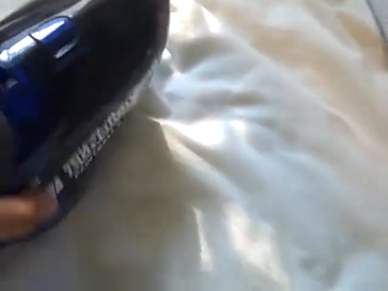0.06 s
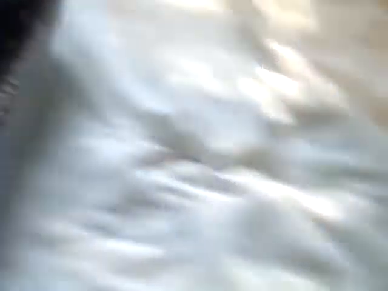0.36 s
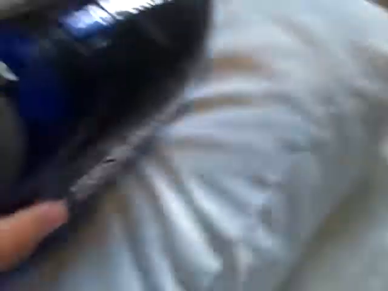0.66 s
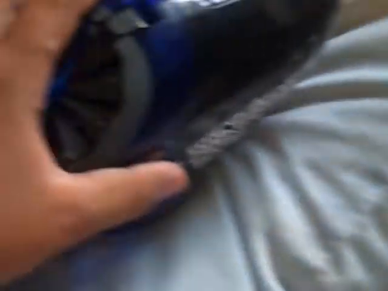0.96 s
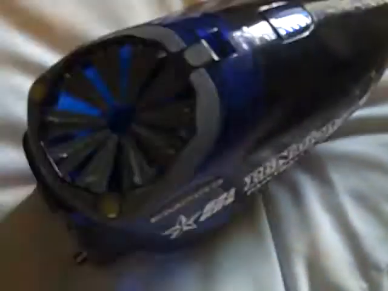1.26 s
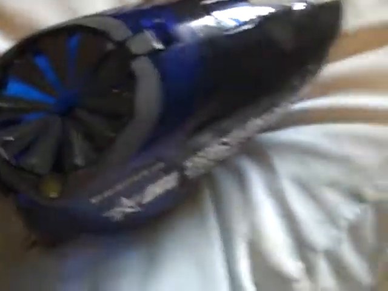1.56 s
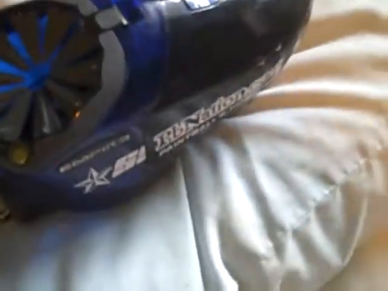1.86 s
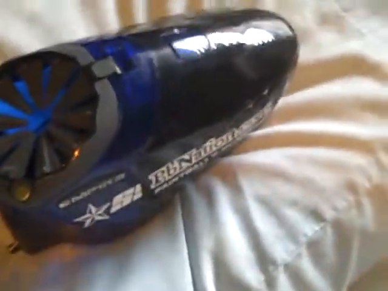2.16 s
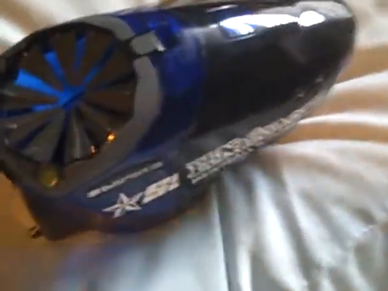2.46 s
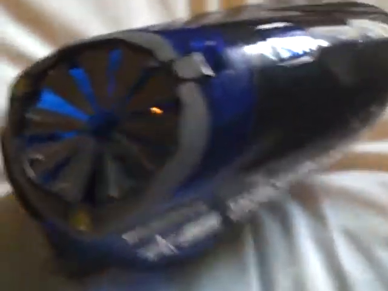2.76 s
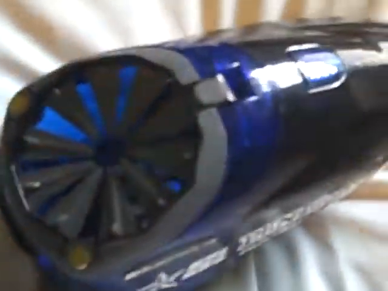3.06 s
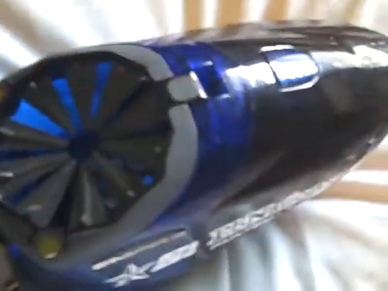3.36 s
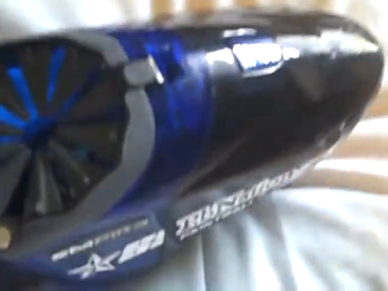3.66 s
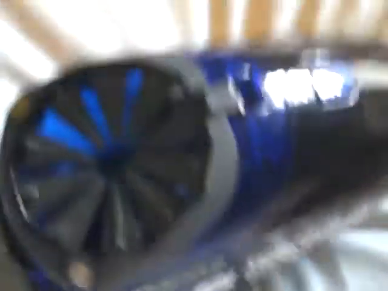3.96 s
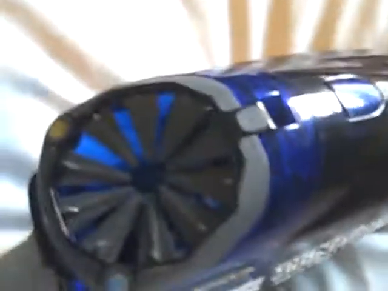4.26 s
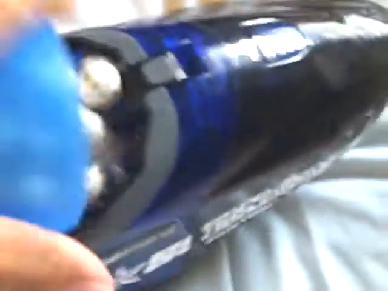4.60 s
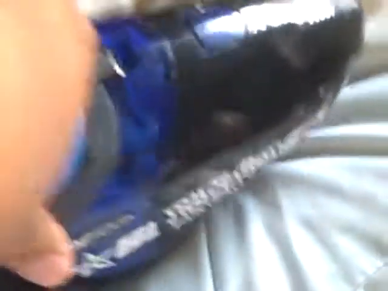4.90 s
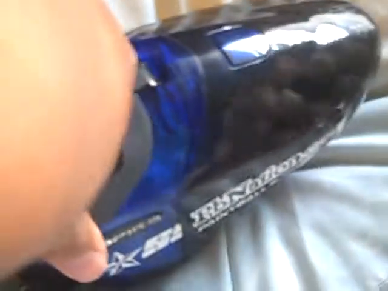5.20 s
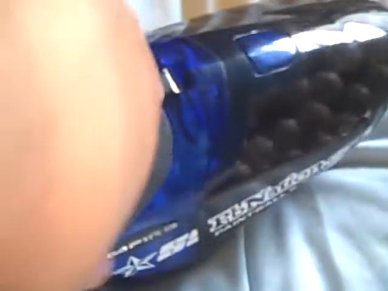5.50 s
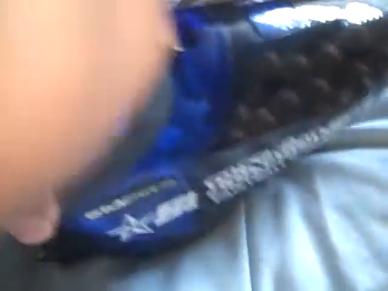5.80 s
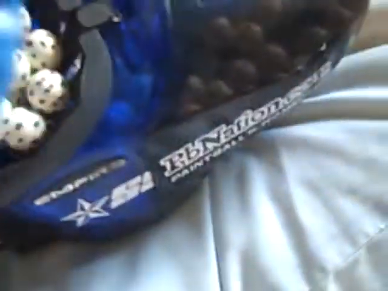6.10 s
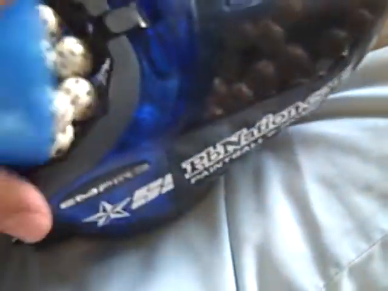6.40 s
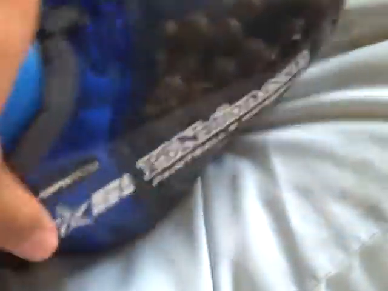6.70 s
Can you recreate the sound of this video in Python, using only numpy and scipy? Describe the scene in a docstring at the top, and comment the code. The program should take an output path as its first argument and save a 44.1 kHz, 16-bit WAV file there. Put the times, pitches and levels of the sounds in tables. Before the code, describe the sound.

In a quiet bedroom, hands lightly tap and faintly rub a hollow plastic hopper close to the microphone, with a slight rustle of bedding. A catch snaps once, sharply, ringing the empty shell. About a second later paintballs are poured in, hitting the walls and each other in a dense, hollow clatter. The rattle thins to single knocks, short rolls and a few soft bumps on the plastic.

```python
"""In a quiet bedroom, a plastic paintball hopper (a hollow ball holder) lies close by on a bed.
Hands tap and rub it, the bedding rustles, and a catch snaps once, sharply, ringing the empty shell.
Then a pod of paintballs is tipped in: they hit the walls and each other in a dense, hollow clatter.
It thins to single knocks and short rolls as the last balls are shaken out and the pod is drawn away."""
import sys
import numpy as np
from scipy import signal
from scipy.fft import rfft, irfft, next_fast_len
from scipy.io import wavfile
from scipy.ndimage import uniform_filter1d

SR = 44100
rng = np.random.default_rng(int(sys.argv[2]) if len(sys.argv) > 2 else 0)


def inscribe(sig):
    """Save sig as 16-bit PCM at rate SR to the path in sys.argv[1].

    A 1-D sig is mono; a 2-D sig holds one channel per row.
    Samples are clipped to [-1, 1] before scaling.
    """
    pcm = np.round(np.clip(np.atleast_2d(sig).T, -1, 1) * 32767)
    wavfile.write(sys.argv[1], SR, pcm.astype(np.int16))


N = 306438
TIME = np.arange(N) / SR  # seconds into the scene
HIT_TIME = np.arange(SR // 6) / SR  # seconds into one hit
FILLED_S = 5.13  # from about here, balls cover the floor in a heap

# tone of the room air: f/Hz, level/dB
AIR_TONE = [(20, 1.5), (91, -11.5), (123, -10.5), (216, -10.5), (802, -13.5), (1480, -15.5), (16000, -31)]
# electric hum: f/Hz, level/dB
HUM_NOTES = [(118.4, -76), (209.9, -79)]
# fingers and pod bump the plastic, and the catch slips just before it snaps and bounces back after: t/s,
# level/dB, knock f/Hz, thud over knock/dB
TAP_HITS = [(0.0683, -43, 1640, -4), (0.0810, -43.5, 1430, 8.5), (0.1046, -46, 1710, 0),
            (0.6867, -48, 1310, -4), (1.001, -51, 1190, -1), (2.0543, -50, 1770, -16),
            (2.1326, -44, 1720, -21), (3.0535, -46, 1070, -24), (3.2291, -38, 1130, -10),
            (3.2359, -21, 1066, -22), (3.2526, -37.5, 1040, -3), (3.5174, -35, 1390, -29),
            (3.613, -45.5, 1370, -11), (5.5967, -36.5, 1310, -3.5), (5.8479, -33.5, 1570, -3.5),
            (6.5204, -35, 1724, -6.5), (6.657, -33, 1235, -4.5), (6.687, -40.5, 1294, -3.5)]
# tone of a hard tick: f/Hz, level/dB
TICK_TONE = [(1200, -14), (1900, -2), (2700, -1.5), (3200, -4.5), (5400, -7.5), (8100, -20.5), (10000, -19),
             (16000, -30.5)]
# light snaps of plastic: t/s, level/dB
FLICK_HITS = [(0.078, -47.5), (3.075, -56), (3.691, -40.5), (5.707, -47.5), (6.1193, -44), (6.839, -55.5)]
# a faint falling swish of cloth and a faint squeak: middle t/s, length/s, level/dB, f/Hz, glide/(octaves per s)
SWISH_AND_SQUEAK_GLIDES = [(0.496, .08, -61, 1387, -2), (3.419, 0.024, -56, 1078, 10)]
# the bands in each glide: multiple of its pitch, level/dB
GLIDE_PARTS = [(.54, -7.5), (1, -4), (2.02, -13)]
# the hand rubs the shell: middle t/s, length/s, level/dB
RUB_STROKES = [(.69, 0.059, -64), (2.275, 0.029, -71.5), (3.49, 0.13, -64.5), (4.2, 0.029, -64.5),
               (4.245, 0.098, -63.5), (6.676, 0.032, -60)]
# tone of a rub: f/Hz, level/dB
RUB_TONE = [(71, -24), (120, 3), (337, 3), (587, -2), (884, -4.5), (1540, -7.5), (6000, -17), (7800, -45),
            (13200, -120)]
# the bedding rustles: middle t/s, length/s, level/dB
RUSTLE_STROKES = [(.69, 0.063, -73), (2.277, 0.044, -64.5), (2.42, .04, -72.5), (2.56, .04, -72),
                  (2.69, 0.038, -68), (2.87, .05, -74), (3.5, 0.085, -67), (6.68, 0.086, -68.5)]
# tone of a rustle: f/Hz, level/dB
RUSTLE_TONE = [(1500, 0), (4000, 0), (6300, 3), (8200, -9), (11500, -1.5), (16000, -35)]
# the hand slides along the shell: t/s, level/dB
SLIDE_LEVELS = [(1.37, -96), (1.44, -75.5), (1.8, -73.5), (2.0, -88), (2.9, -90), (3.03, -76.5), (4.1, -79),
                (4.3, -100)]
# tone of that slide: f/Hz, level/dB
SLIDE_TONE = [(1500, -2), (5400, -2.5), (6400, 4.5), (8000, -17), (11800, -3), (16000, -21)]
# fine, crisp scrapes: middle t/s, length/s, level/dB
SCRAPE_STROKES = [(2.23, 0.11, -71.5), (3.54, 0.12, -70.5)]
# tone of a scrape: f/Hz, level/dB
SCRAPE_TONE = [(7500, -20), (11500, -6), (13000, -17), (16000, -15)]
# the sharp click: t/s, shell level/dB, crack level/dB
CLICK_HIT = (3.2383, -16, -26.5)
# tone of its crack: f/Hz, level/dB
CRACK_TONE = [(1200, -18), (2200, 2.5), (5500, -8), (8200, -16), (10900, -9.5), (16000, -25)]
# notes of the empty shell: f/Hz, level/dB, t60/s (time to fade by 60 dB)
SHELL_NOTES = [(285, -6, 0.058), (686, -13.5, 0.02), (760, 1, 0.016), (913, -11.5, 0.032),
               (1280, -3.5, 0.018), (1360, -21, 0.035), (1700, -15, 0.024), (3000, -26, 0.018)]
# note of the air inside it: f/Hz, level/dB, t60/s
INNER_AIR_NOTES = [(275, -21.5, 0.23)]
# notes of the catch itself: f/Hz, level/dB, t60/s
CATCH_NOTES = [(5480, 3, 0.0032), (7040, -3.5, 0.0037), (9500, -17, .005)]
# balls that stand out: t/s, level/dB, tick over knock/dB
BALL_HITS = [(4.5098, -33.5, -19), (4.5333, -24.5, -6.5), (4.578, -28, -12.5), (4.6288, -18, -15),
             (4.6501, -24, -7.5), (4.66, -21, -10), (4.6628, -19.5, -10), (4.7034, -7.5, -20.5),
             (4.746, -21.5, -4), (4.7668, -20.5, -9), (4.791, -11, -15), (4.799, -19, -7),
             (4.8113, -18.5, -19), (4.8262, -8.5, -21.5), (4.858, -25.5, -5.5), (4.8991, -11.5, -20),
             (4.9044, -12.5, -11.5), (4.915, -23.5, -3), (4.9581, -18, -8.5), (4.977, -16.5, -14),
             (5.011, -23, -5.5), (5.02, -13.5, -20), (5.0345, -14, -12.5), (5.056, -17, -21),
             (5.088, -15.5, -14), (5.099, -9, -27.5), (5.109, -11, -17.5), (5.1294, -15.5, -15),
             (5.19, -16.5, -14.5), (5.195, -21.5, -10.5), (5.219, -20.5, -15), (5.281, -22, -13.5),
             (5.329, -29.5, -13), (5.42, -33, -35), (5.473, -31, -13.5), (5.6875, -35.5, -10),
             (5.6938, -27, -21), (5.706, -38, -22), (5.7192, -19.5, -20.5), (5.7636, -25.5, -26),
             (5.9475, -28.5, -15), (6.0134, -34, -12.5), (6.0188, -33, -16.5), (6.0639, -39, -20),
             (6.149, -43.5, -12), (6.2522, -42, -7.5), (6.318, -38.5, -14.5), (6.353, -38, -17.5),
             (6.4136, -37.5, -19), (6.425, -40, -13), (6.4394, -34, -14.5), (6.4581, -44.5, -11)]
# wall notes that ring on after a ball: f/Hz, level/dB, t60/s
WALL_NOTES = [(970, -21, .06), (1272, -24, 0.062), (1383, -33.5, 0.29)]
# the pour swells as the pod tips and dies as it empties: t/s, level/dB
POUR_LEVELS = [(4.53, -72), (4.6, -52), (4.66, -42), (4.8, -40), (5.06, -33.5), (5.24, -40), (5.34, -46),
               (5.48, -63)]
# shakes of the pod set the heap rolling: middle t/s, length/s, level/dB
POD_SHAKES = [(5.54, 0.046, -59), (5.64, 0.059, -53.5), (5.77, 0.083, -57), (6.02, 0.082, -61),
              (6.46, 0.083, -60.5), (6.68, 0.051, -55.5), (6.76, 0.046, -63.5)]
# echo inside the hopper: f/Hz, t60/s
HOPPER_ECHO = [(250, 0.18), (1200, 0.037), (4000, 0.055), (12000, 0.032)]
# echo of the bedroom: f/Hz, t60/s
ROOM_ECHO = [(200, 0.21), (1400, 0.23), (6000, 0.29), (14000, 0.13)]


def amp(db):
    """Turn decibels into a factor to multiply by."""
    return 10 ** (np.asarray(db) / 20)


def unit(x):
    """Scale x to an average (rms) size of 1."""
    return x / np.sqrt(np.mean(x ** 2) + 1e-20)


def along(points, hz):
    """Read between (f/Hz, value) points on a pitch-like scale."""
    freqs, values = np.transpose(points)
    return np.interp(np.log(hz + 1), np.log(freqs + 1), values)


def coloured(x, tone):
    """Filter x to a tone; the table sets only the balance of low and high."""
    size = next_fast_len(N + SR // 4, True)
    gain = unit(amp(along(tone, np.fft.rfftfreq(size, 1 / SR))))
    cepstrum = irfft(np.log(np.maximum(gain, 1e-6)), size)
    # this fold makes the filter ring after a hit, never before it
    cepstrum[1:size // 2] *= 2
    cepstrum[size // 2 + 1:] = 0
    return irfft(rfft(x, size) * np.exp(rfft(cepstrum)), size)[:N]


def noise(tone):
    """Steady noise with the given tone."""
    return unit(coloured(rng.standard_normal(N), tone))


def fade(t, t60):
    """Die away by 60 dB every t60 seconds."""
    return np.exp(-np.log(1000) * t / t60)


def rise(attack_s):
    """The quick start of a hit, from 0 to 1."""
    return 1 - np.exp(-HIT_TIME / attack_s)


def ring(hz, t60, attack_s):
    """One note that is struck and fades."""
    return np.sin(2 * np.pi * hz * HIT_TIME) * fade(HIT_TIME, t60) * rise(attack_s)


def struck(notes):
    """One blow rings several notes; neighbours swing opposite ways."""
    return sum(amp(db) * (-1) ** k * ring(hz, t60, 0.00038) for k, (hz, db, t60) in enumerate(notes))


def burst(t60, attack_s):
    """A short crack of noise."""
    return rng.standard_normal(len(HIT_TIME)) * fade(HIT_TIME, t60) * rise(attack_s)


def swell(s, length):
    """A smooth rise and fall around time s."""
    return np.exp(-2 * ((TIME - s) / length) ** 2)


def swells(rows):
    """One loudness curve from (t/s, length/s, level/dB) rows."""
    return sum(amp(db) * swell(s, length) for s, length, db in rows)


def after(s, middle_s, takes_s):
    """A smooth step from 0 to 1."""
    return (1 + np.tanh((s - middle_s) / takes_s)) / 2


def add(track, s, sound):
    """Mix a sound into a track at time s."""
    part = track[max(round(s * SR), 0):][:len(sound)]
    part += sound[:len(part)]


def cut_bass(x, corner_hz=185):
    """Take out the lows, of which a small shell gives off very little."""
    return signal.sosfilt(signal.butter(N=4, Wn=corner_hz, btype="high", fs=SR, output="sos"), x)


def echoes(x, decay, size=4096):
    """A wash of echoes that keeps changing; each frequency dies at its own speed."""
    wet, window = np.zeros(N), signal.get_window("hann", size)
    for start in range(0, N - size, size // 2):
        hz, t, bands = signal.stft(rng.standard_normal(SR // 3), SR, nperseg=128)
        tail = signal.istft(bands * fade(t, along(decay, hz)[:, None]), SR, nperseg=128)[1]
        piece = x[start:start + size] * window
        add(wet, start / SR + .002, signal.fftconvolve(piece, tail / np.linalg.norm(tail)))
    return wet


def impacts(rows, knock_t60, tick_t60, thud_hz, thud_spread, side_db):
    """Each hit knocks the wall, thuds the whole shell and ticks where hard surfaces meet."""
    body, ticks = np.zeros(N), np.zeros(N)
    for s, knock_db, hz, thud_db, tick_db in rows:
        below, above, low, skin = rng.standard_normal(4)
        # the notes on either side of the knock depend on the spot that is hit
        lower = ring(hz * 0.731 * np.exp(0.12 * below), 0.013, 0.0008)
        upper = ring(hz * 1.365 * np.exp(0.16 * above), 0.0079, 0.00062)
        knock = ring(hz, knock_t60, 0.00061) + amp(side_db) * (lower + upper)
        thud = ring(thud_hz * np.exp(thud_spread * low), 0.034, 0.004)
        tick = burst(tick_t60, 0.00041) + 0.78 * ring(4300 * np.exp(0.29 * skin), 0.0039, 0.00024)
        add(body, s, amp(knock_db) * knock + amp(thud_db) * thud)
        add(ticks, s, amp(tick_db) * tick)
    return body + coloured(ticks, TICK_TONE)


def room_air():
    """Still air with a faint electric hum."""
    air = amp(-69.0) * noise(AIR_TONE)
    return air + sum(amp(db) * np.sin(2 * np.pi * (hz * TIME + rng.random())) for hz, db in HUM_NOTES)


def taps(empty_hz=355, loaded_hz=234, tick_db=-12):
    """Fingers, pod and the slipping catch tap the plastic; a load of balls makes the thud deeper."""
    rows = [(s, db, hz, db + weight_db, db + tick_db) for s, db, hz, weight_db in TAP_HITS]
    empty = [row for row in rows if row[0] < FILLED_S]
    loaded = [row for row in rows if row[0] >= FILLED_S]
    return sum(impacts(part, knock_t60=0.011, tick_t60=0.015, thud_hz=hz, thud_spread=0.078, side_db=-2.5)
               for part, hz in [(empty, empty_hz), (loaded, loaded_hz)])


def flicks(ring_hz=4200):
    """Thin plastic edges snap past each other and stop dead."""
    snaps = np.zeros(N)
    for s, db in FLICK_HITS:
        add(snaps, s, amp(db) * (burst(0.014, 0.00036) + ring(ring_hz, 0.0036, 0.0005)))
    return coloured(snaps, TICK_TONE)


def swish_and_squeak(width_hz=55):
    """A falling swish of cloth and a squeak of sliding plastic: narrow bands of noise glide together as the
    speed changes."""
    sound = np.zeros(N)
    smoothing = np.exp(-2 * np.pi * width_hz / SR)
    for s, length, db, hz, glide in SWISH_AND_SQUEAK_GLIDES:
        pitch_hz = hz * 2 ** (glide * np.clip(TIME - s, -length, length))
        phase = 2 * np.pi * np.cumsum(pitch_hz) / SR
        for multiple, band_db in GLIDE_PARTS:
            wobble = signal.lfilter([1], [1, -smoothing], rng.standard_normal((2, N)))
            band = unit(wobble[0] * np.cos(multiple * phase) + wobble[1] * np.sin(multiple * phase))
            sound += amp(db + band_db) * swell(s, length) * band
    return sound


def rubbing(grain_db=3):
    """Strokes of skin and cloth, rough with tiny slips, over the smooth hiss of a sliding hand."""
    grain = unit(uniform_filter1d(rng.standard_normal(N), size=200))
    slips = unit(amp(grain_db * grain))
    rubs = swells(RUB_STROKES) * noise(RUB_TONE)
    rustles = swells(RUSTLE_STROKES) * noise(RUSTLE_TONE)
    scrapes = swells(SCRAPE_STROKES) * noise(SCRAPE_TONE)
    slide = amp(np.interp(TIME, *np.transpose(SLIDE_LEVELS))) * noise(SLIDE_TONE)
    return slips * (rubs + rustles + scrapes) + slide


def click(drag_db=-39.5, drag_s=.004):
    """A plastic catch drags, snaps over with a crack and rings the empty shell."""
    s, shell_db, crack_db = CLICK_HIT
    shell = np.zeros(N)
    add(shell, s + 0.00044, amp(shell_db) * (struck(SHELL_NOTES) + struck(INNER_AIR_NOTES)))
    crack = amp(drag_db) * swell(s, drag_s) * rng.standard_normal(N)
    add(crack, s, amp(crack_db) * burst(0.011, 0.00081))
    return shell + coloured(crack, CRACK_TONE)


def catch_ping():
    """The tiny catch itself rings, high and very briefly, as it snaps."""
    s, shell_db, _ = CLICK_HIT
    ping = np.zeros(N)
    add(ping, s, amp(shell_db + 3.5) * struck(CATCH_NOTES))
    return ping


def single_knocks(knock_hz=1295, spread=0.077, thud_db=-33.5):
    """The hardest-hitting balls, and the last ones dropping onto the heap; the wall rings on."""
    rows = [(s, db, knock_hz * np.exp(spread * rng.standard_normal()), db + thud_db, db + hardness_db)
            for s, db, hardness_db in BALL_HITS]
    wall = np.zeros(N)
    for s, db, _ in BALL_HITS:
        add(wall, s, amp(db + rng.normal(0, 1)) * struck(WALL_NOTES))
    hits = impacts(rows, knock_t60=0.01, tick_t60=0.016, thud_hz=298, thud_spread=0.059, side_db=-9.5)
    return wall + hits


def flow(settling_db=-70.5):
    """How strongly the balls move, in dB: the pour, then shakes over a heap that never quite rests."""
    pour_db = np.interp(TIME, *np.transpose(POUR_LEVELS), right=settling_db)
    return 20 * np.log10(np.hypot(amp(pour_db), swells(POD_SHAKES)))


def tumbling_balls(peak_hits_per_s=1100, scatter_db=2.5, count=2200):
    """Balls collide as they pour: the stronger the flow, the more hits and the harder each one."""
    flow_db = flow()
    peak_db = flow_db.max()
    rate = peak_hits_per_s * amp(0.45 * (flow_db - peak_db))
    hits_so_far = np.cumsum(rate * (TIME > POUR_LEVELS[0][0])) / SR
    turns = np.arange(count) + rng.uniform(0, 2, count)
    times = np.interp(turns[turns < hits_so_far[-1]], hits_so_far, TIME)
    chance = rng.standard_normal((count, 4))
    force, pitch, weight, hardness = np.clip(chance[:len(times)].T, -2, 2)
    # balls arrive in clumps, and the hard ticks swell most with each clump
    clump = unit(uniform_filter1d(rng.standard_normal(count), size=9))[:len(times)]
    force = force + 0.23 * clump
    hardness = 1.04 * hardness + 0.4 * clump
    # when hits are fewer, each carries more of the level
    hit_db = peak_db + scatter_db * force - 10 * np.log10(np.interp(times, TIME, rate) / peak_hits_per_s)
    drop_db = np.interp(times, TIME, flow_db) - peak_db
    boom_db = 7 * (1 - after(times, 4.67, takes_s=0.015))  # the bare floor booms until it is covered
    filled = after(times, FILLED_S, takes_s=0.15)  # later balls land on the heap, more softly
    # the thud drops least as the flow weakens, so gentle hits are duller
    knock_db = hit_db + drop_db + 8.0
    thud_db = hit_db + 0.66 * drop_db - 11 + boom_db - 3 * filled + 4.4 * weight
    tick_db = hit_db + 0.9 * drop_db - 4 - 6.5 * filled + 2.7 * hardness
    rows = zip(times, knock_db, 1200 * np.exp(.22 * pitch), thud_db, tick_db)
    return impacts(rows, knock_t60=0.0091, tick_t60=0.01, thud_hz=349.5, thud_spread=0.18, side_db=-5.5)


def scene():
    """The balls sound through the hollow hopper; the room echoes faintly, its bass soaked up by the bed."""
    balls = single_knocks() + tumbling_balls()
    inside = cut_bass(balls + amp(-10.5) * echoes(balls, HOPPER_ECHO))
    outside = cut_bass(click() + taps())
    ping = catch_ping()  # faces the listener, so little of it goes to the room
    shell_echo = amp(-20) * echoes(cut_bass(outside + ping, corner_hz=900), HOPPER_ECHO)
    into_room = amp(-22.0) * inside + amp(-10.0) * outside + amp(-24) * ping
    room_echo = echoes(cut_bass(into_room, corner_hz=404), ROOM_ECHO)
    handling = flicks() + rubbing() + swish_and_squeak()
    return (inside + outside + ping + shell_echo + room_echo + handling + room_air())[None]


def record(dry, top_hz=15900):
    """Cut away the very highest treble."""
    size = next_fast_len(N + SR // 4, True)
    return irfft(rfft(dry, size) * (np.fft.rfftfreq(size, 1 / SR) < top_hz), size)[:, :N]


dry = scene()
out = record(dry)
inscribe(out)
```